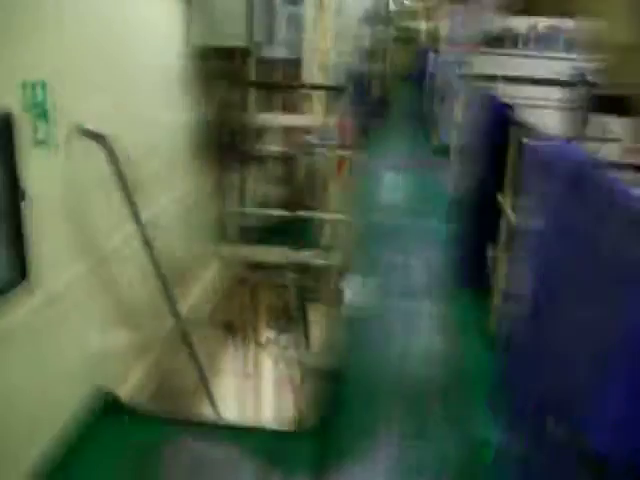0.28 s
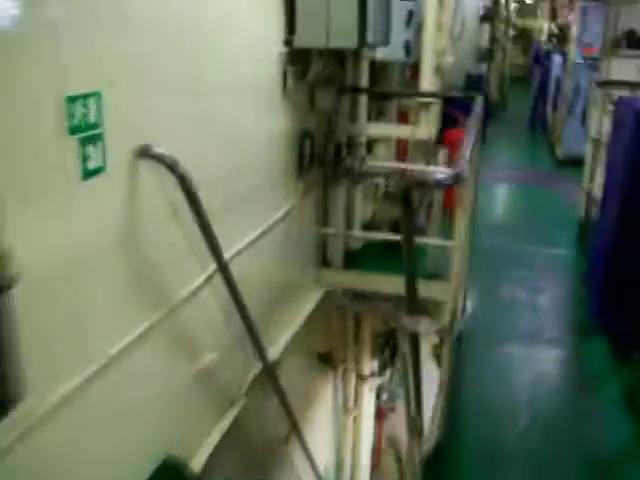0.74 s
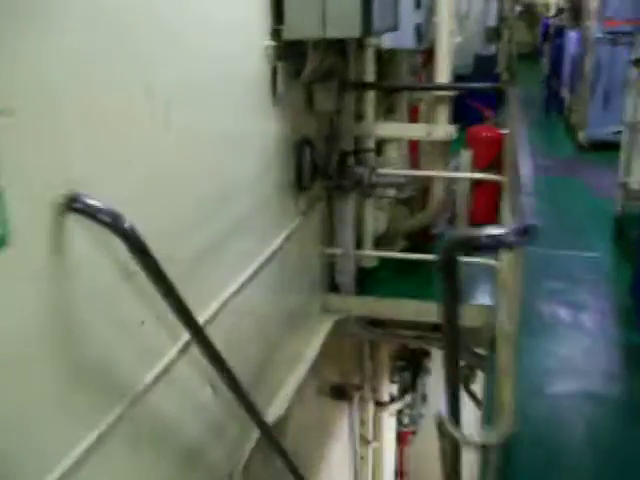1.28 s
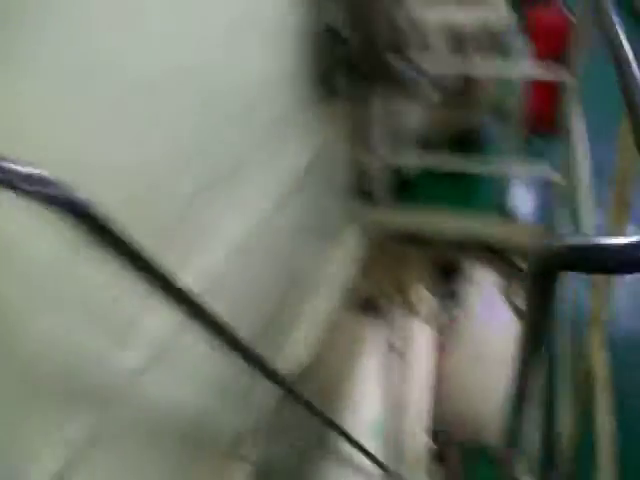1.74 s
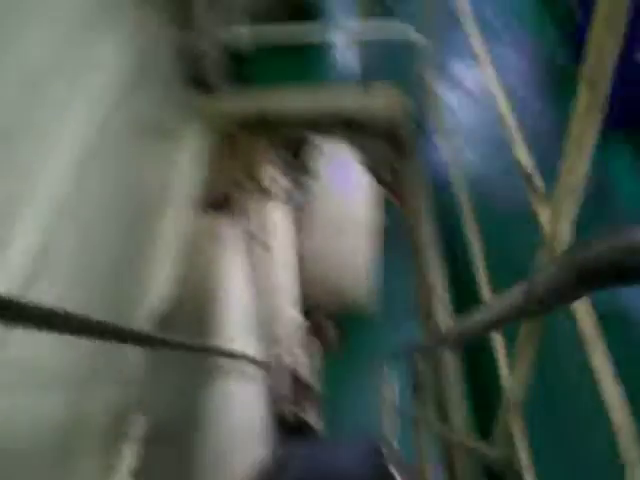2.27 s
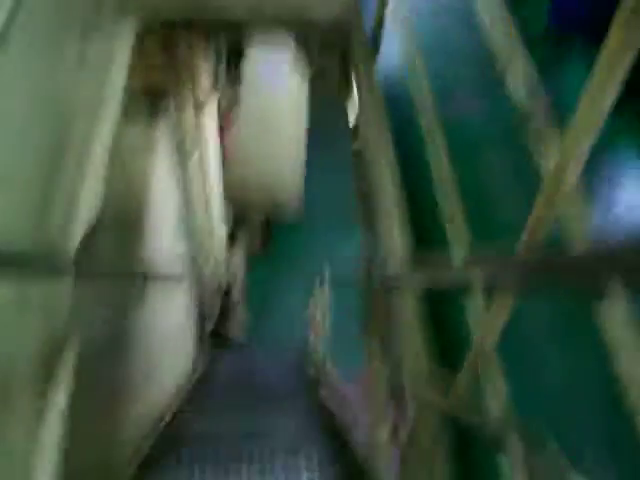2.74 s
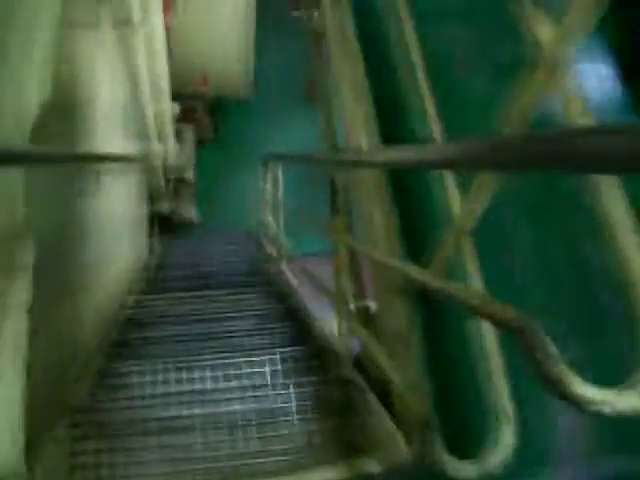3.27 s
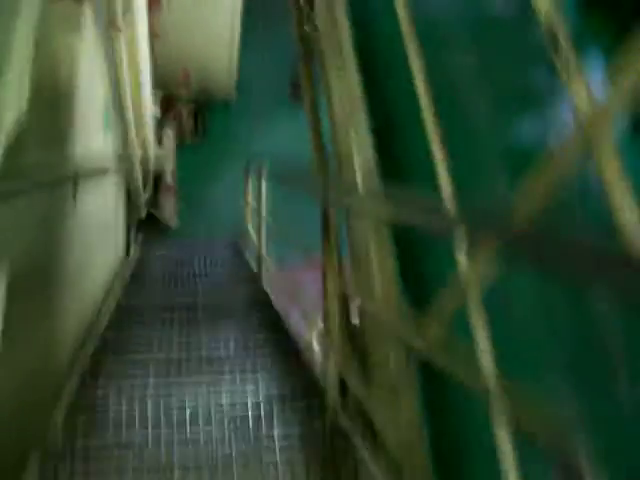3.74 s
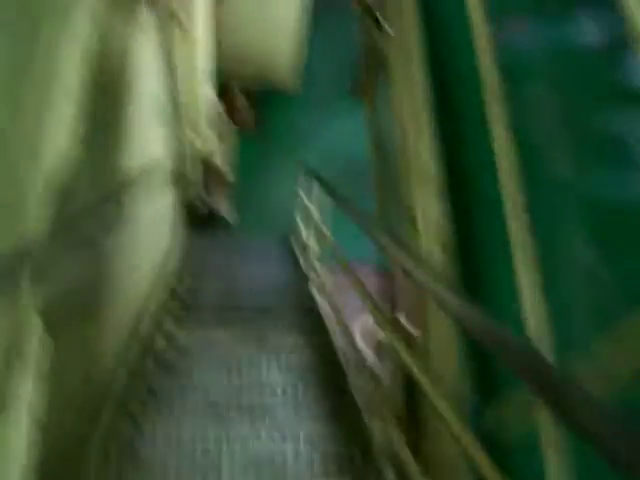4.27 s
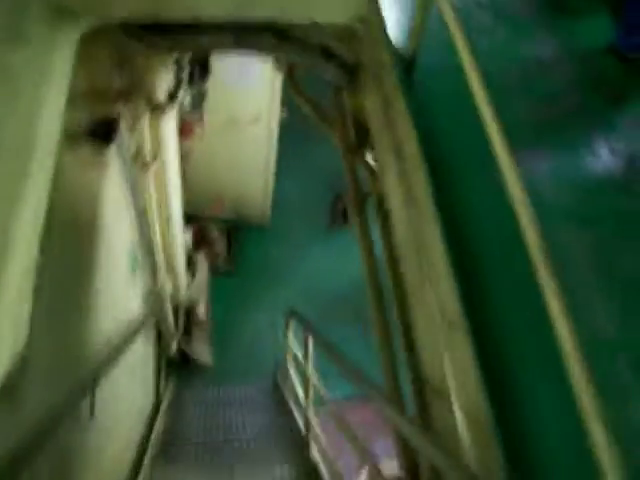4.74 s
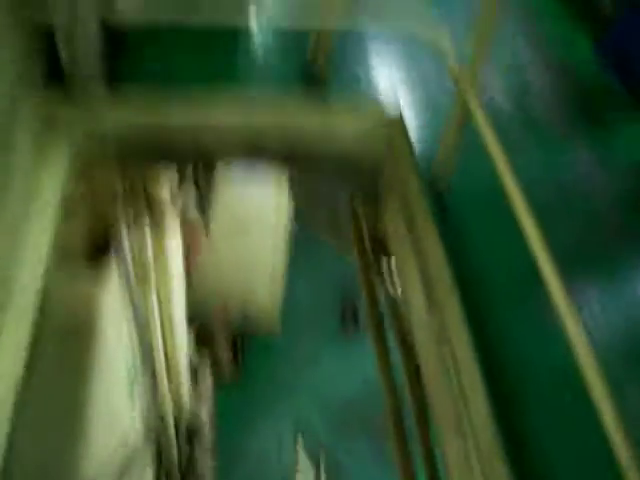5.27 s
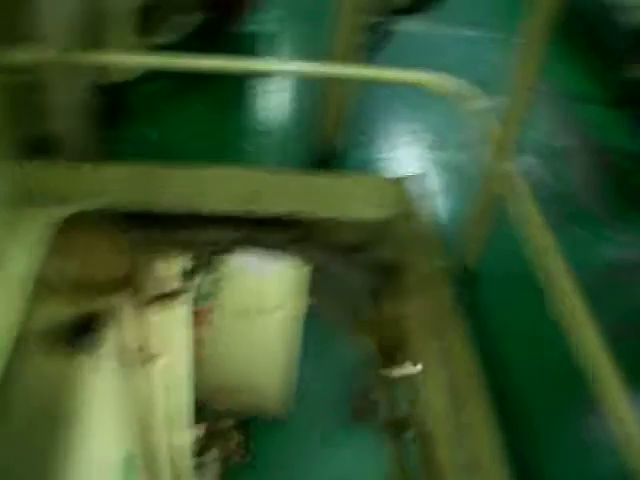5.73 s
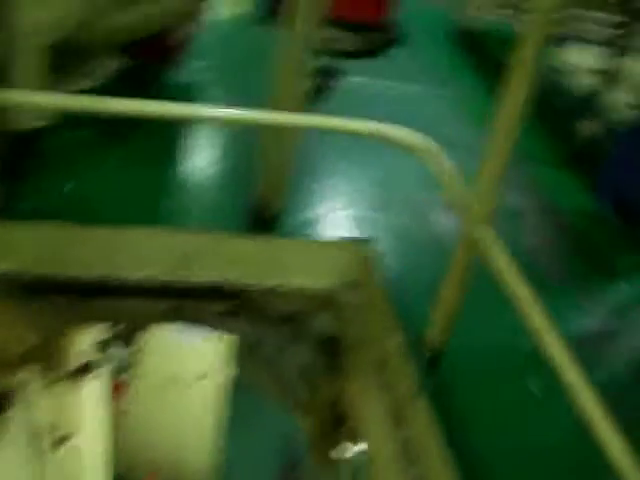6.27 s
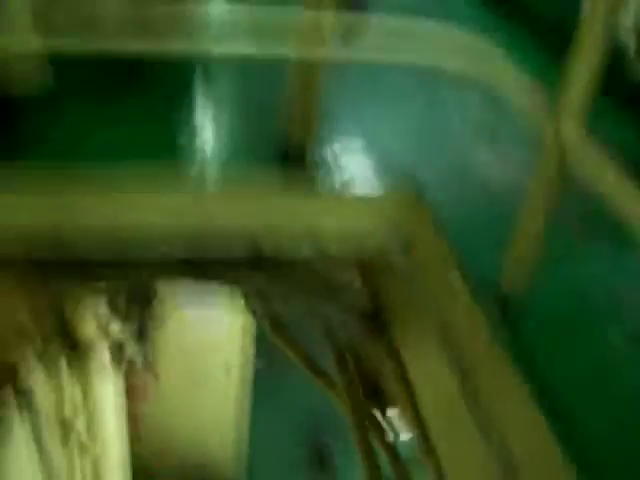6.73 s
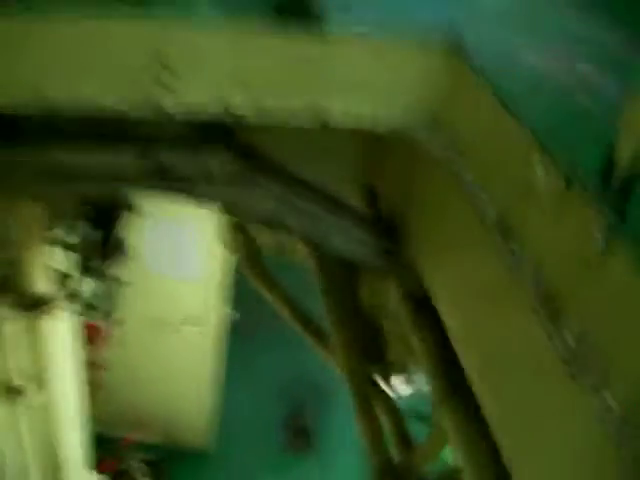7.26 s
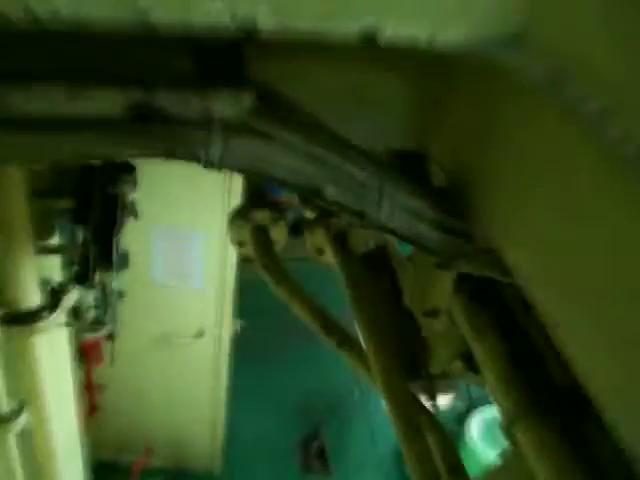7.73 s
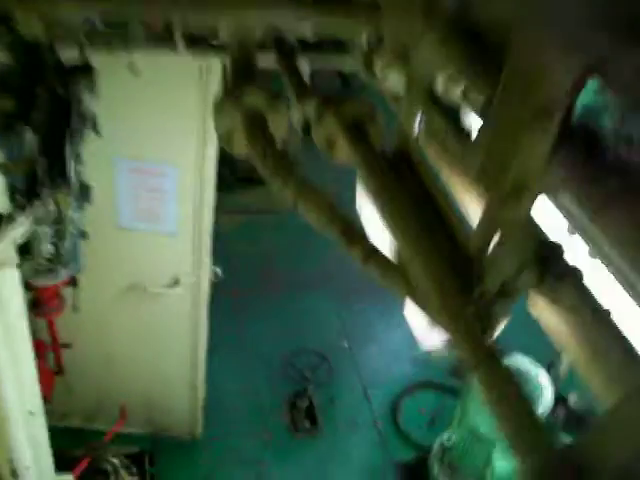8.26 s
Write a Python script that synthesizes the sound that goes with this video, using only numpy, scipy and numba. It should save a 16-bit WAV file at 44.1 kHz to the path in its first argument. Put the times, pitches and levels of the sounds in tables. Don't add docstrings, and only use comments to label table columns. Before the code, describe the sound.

Continuous, very loud machinery noise on a ship, heard from a handheld camera moving from an open hall towards a stairwell. Low engine pulses beat against each other over hull rumble, rough combustion roar and metallic clatter. A high, piercing whine fades in and out as the camera turns; a mid-pitched hum swells. Sharp knocks come around two seconds and near five, all compressed and slightly distorted.

```python
import sys
import numpy as np
from scipy import signal
from scipy.fft import rfft, irfft, next_fast_len
from scipy.io import wavfile
from scipy.ndimage import uniform_filter1d, map_coordinates
from numba import njit

SR = 44100
rng = np.random.default_rng(int(sys.argv[2]) if len(sys.argv) > 2 else 0)


def nominal_scale(level):
    x = np.asarray(level, float) / 20
    return 10 ** x


def transcribe(u):
    v = np.clip(np.atleast_2d(u).T, -1, 1)
    q = np.round(v * 32767).astype(np.int16)
    wavfile.write(sys.argv[1], SR, q)


N = 374850
TIME = np.arange(N) / SR
FULL_SCALE = 0.7

# (cycle rate [Hz], moment of one firing [s])
TWINS = [
    (4.0460, 4.4771),
    (3.9853, 4.4768),
]


def unit(x):
    return x / np.sqrt(np.mean(x ** 2) + 1e-20)


def curves(rows):
    s, *columns = np.transpose(rows)
    return [np.interp(TIME, s, column) for column in columns]


def wobble(rate):
    points = rng.standard_normal(int(N * rate / SR) + 4)
    return map_coordinates(points, [TIME * rate])


def coloured(x, spectrum):
    size = next_fast_len(N + 8192)
    hz, db = np.transpose(spectrum)
    bins = np.fft.rfftfreq(size, 1 / SR)
    gain = nominal_scale(np.interp(np.log(bins + 1), np.log(hz + 1), db))
    return irfft(rfft(x, size) * gain, size)[:N]


def rush(spectrum, patchy_db):
    z = signal.stft(rng.standard_normal(N + 512), nperseg=512)[2]
    patches = uniform_filter1d(rng.standard_normal(z.shape), size=5, axis=0)
    patches = uniform_filter1d(patches, size=12, axis=1)
    noise = signal.istft(z * nominal_scale(patchy_db * unit(patches)), nperseg=512)[1][:N]
    return unit(coloured(noise, spectrum))


def narrow(hz, width):
    turn = 2 * np.pi * hz * TIME
    return unit(wobble(width) * np.cos(turn) + wobble(width) * np.sin(turn))


def in_step():
    (near_hz, near_fired), (far_hz, _) = TWINS
    half_beat = 6 * np.pi * (near_hz - far_hz)
    return np.abs(np.cos(half_beat * (TIME - near_fired)))


def pushed(mean_db, swing_db):
    return mean_db + swing_db * in_step()


def firings(decay_s, scatter_db):
    blows = np.zeros(N)
    for cycle_hz, fired in TWINS:
        at = np.flatnonzero(np.diff(np.floor(6 * cycle_hz * (TIME - fired))))
        blows[at] += nominal_scale(scatter_db * rng.standard_normal(len(at)))
    t = TIME[:SR // 10]
    return unit(signal.fftconvolve(blows, t * np.exp(-t / decay_s))[:N])


def pump():
    # (time [s], length [s], level [dB])
    swells = [
        (0.503, .45, -34.5),
        (2.902, 1.0, -30),
        (4.19, .4, -36),
        (6.002, .6, -23.5),
        (7.1, .4, -40),
        (8.5, .5, -33),
    ]
    level = sum(nominal_scale(db) * np.exp(-((TIME - s) / length) ** 2) for s, length, db in swells)
    return level * np.sin(2 * np.pi * 546.4 * TIME + 0.6 * wobble(2.5))


def hull_rumble(deck_db):
    # (frequency [Hz], level [dB per Hz])
    spectrum = [(5, -28.5), (12, -6), (38, -0.5), (60, -2), (100, -2.5), (150, -3.5), (200, -12),
                (330, -46), (600, -120)]
    return nominal_scale(pushed(-31, 8) + 0.4 * deck_db + 3.0) * rush(spectrum, patchy_db=0.0)


def whistles():
    # (frequency [Hz], width [Hz], level [dB])
    lines = [(3181, 14, -41), (4860, 38, -55), (2560, 120, -47), (3088, 45, -41.5), (390, 5, -36.5),
             (790, 12, -46), (99, 1, -36)]
    return sum(nominal_scale(db + wobble(1.2)) * narrow(hz, width) for hz, width, db in lines)


def turbocharger():
    # (time [s], frequency [Hz])
    blade_tone = [(0, 3083), (1.3, 3083), (2.4, 3089), (4.2, 3089), (4.9, 3086), (5.6, 3089), (8.5, 3086)]
    # (time [s], level [dB])
    shading = [(0, -28), (.54, -27), (.77, -27), (1.28, -29), (1.58, -21), (2.06, -35.5), (2.45, -24),
               (2.95, -34.5), (3.65, -37.5), (4.1, -29), (4.85, -36.5), (5.39, -26.5), (5.78, -38),
               (6.05, -29.5), (7.04, -35.5), (7.65, -35), (8.07, -28.5), (8.5, -30.5)]
    # (time [s], width [s], depth [dB])
    quiet_spots = [(.075, 0.026, -12.5), (0.169, 0.065, -9), (.335, .04, -8.5), (.499, 0.033, -11),
                   (.64, 0.026, -7), (1.168, 0.055, -10.5), (1.393, 0.077, -12.5), (1.514, 0.11, -13),
                   (1.605, 0.09, -17), (2.309, 0.1, -10.5), (2.59, 0.079, -4), (3.056, .121, -10),
                   (3.994, 0.2, -11.7), (4.174, 0.07, -9), (4.276, 0.03, -14.5), (4.343, 0.059, -11.8),
                   (4.72, .14, -8.5), (5.107, .049, -9.5), (5.312, 0.16, -14.5), (6.15, 0.054, -12),
                   (6.58, .162, -8), (6.798, .047, -10), (6.943, .036, -11.5), (7.304, .05, -10.5),
                   (7.39, .04, -9.5), (7.494, .033, -11.5), (7.65, .039, -7.5), (8.129, 0.064, -16),
                   (8.27, 0.13, -14.5), (8.46, 0.062, -16)]
    hz = curves(blade_tone)[0] + 2.6 * wobble(5) + 3 * wobble(25)
    paths = 1 + 0.3 * (wobble(30) + 1j * wobble(30))
    tone = np.sqrt(2) * np.real(paths * np.exp(2j * np.pi * np.cumsum(hz) / SR))
    level_db = curves(shading)[0] + pushed(1, 6.5) + 1.1 * wobble(40)
    for s, width, depth_db in quiet_spots:
        level_db = level_db + depth_db * np.exp(-(2.6 * (TIME - s) / width) ** 2)
    return nominal_scale(level_db) * tone


def casing_clatter(hall_db, shared):
    # (frequency [Hz], level [dB per Hz])
    spectrum = [(530, -34), (900, 0), (1040, -5.5), (1890, -14.5), (2900, -9.5), (2990, -8.5), (3160, -10),
                (3350, -11), (4990, -21), (5600, -23), (7280, -51), (12300, -120)]
    level_db = pushed(-35, 6.5) + 1.3 * hall_db + 3.0 + 0.5 * shared
    pulses = 1 + 0.11 * firings(0.0031, 3.9)
    return nominal_scale(level_db) * unit(pulses * rush(spectrum, patchy_db=0.4))


def sharp_peaks():
    # (time [s], peak level [dB])
    sudden_peaks = [
        (2.150, -0.5),
        (2.313, -7.5),
        (4.825, -12.5),
        (5.073, -11.5),
        (5.681, -6.5),
    ]
    out, t = np.zeros(N + SR), TIME[:SR // 50]
    for s, db in sudden_peaks:
        hiss = 0.15 * rng.standard_normal(len(t)) * nominal_scale(-60 * t / 0.008)
        ring = np.sin(2 * np.pi * 650 * t) + hiss
        out[round(s * SR):][:len(t)] -= nominal_scale(db + 0.5 - 60 * t / 0.012) * ring
    return out[:N]


def cycle_roar():
    # (frequency [Hz], level [dB per Hz])
    spectrum = [(100, -39.5), (150, -6.5), (250, 0), (400, 0.5), (600, -10), (1000, -47), (2000, -120)]
    out = np.zeros(N)
    for cycle_hz, fired in TWINS:
        size = round(SR / cycle_hz)
        one_cycle = rng.standard_normal(size)
        wandering = TIME + 0.0006 * wobble(0.8)
        out += np.interp(wandering * cycle_hz % 1, np.arange(size) / size, one_cycle)
    return unit(coloured(out, spectrum))


def combustion_roar(hall_db, shared):
    # (frequency [Hz], level [dB per Hz])
    spectrum = [(90, -45), (150, -13.5), (190, -11), (260, -9.5), (398, -7.5), (535, -8), (673, -13),
                (792, -12.5), (1030, -31), (1230, -21.5), (1500, -31), (1950, -62), (3300, -120)]
    level_db = pushed(-23, 6.5) + hall_db + 0.7 + 0.25 * shared
    pulses = 1 + 0.13 * firings(0.0027, 2.4)
    noise = rush(spectrum, patchy_db=-0.06) + nominal_scale(-8) * cycle_roar()
    return nominal_scale(level_db) * unit(pulses * noise)


def engine(cycle_hz, fired, orders, rest_db, boom_db):
    crank = 2 * np.pi * cycle_hz * (TIME - fired)
    sound = nominal_scale(-16.8 + 0.3 * wobble(0.7)) * np.cos(6 * crank)
    for k, db in orders:
        if k == 6:
            continue
        drift = rng.uniform(0, 2 * np.pi) + 0.0071 * k * wobble(0.8)
        deck = boom_db if k == 18 else 0
        sound += nominal_scale(db + rest_db + deck + 1.5 * wobble(0.44)) * np.cos(k * crank + drift)
    return np.sqrt(2) * sound


def twin_diesels(deck_db):
    # (multiple of the cycle rate [1], rms level [dB])
    near_tones = [(5, -34.2), (6, -20.6), (7, -34.8), (8, -36.0), (11, -38.2), (12, -38.8), (13, -37.2),
                  (17, -37.9), (18, -35.9), (19, -36.8), (21, -46.3), (22, -45.1), (23, -42.5), (24, -37.5),
                  (25, -36.1), (26, -36.9), (28, -45.8), (29, -41.0), (30, -44.3), (35, -39.6), (36, -44.3),
                  (37, -44.9), (45, -44.6), (46, -42.4), (48, -46.1), (49, -43.8), (50, -44.0), (53, -43.3),
                  (54, -41.2), (57, -46.5)]
    far_tones = [(5, -39.1), (6, -21.5), (7, -40.0), (8, -44.7), (10, -45.2), (11, -38.8), (12, -41.5),
                 (13, -38.3), (16, -46.4), (17, -40.0), (18, -30.5), (19, -42.2), (20, -43.2), (23, -41.9),
                 (28, -42.3), (46, -39.4), (49, -45.6), (50, -44.2), (54, -47.5), (55, -41.8)]
    shake_db = pushed(-2.9, 6.6)
    near = engine(*TWINS[0], near_tones, shake_db, -6.0)
    far = engine(*TWINS[1], far_tones, shake_db, deck_db + 1.2)
    return near + far


def scene():
    # (time [s], open hall level [dB], lower deck level [dB])
    view = [(0, 1, -4), (.6, 0, -0.5), (1.3, 1, -8), (2, 0, -3), (2.6, 0, -2.5), (3.3, 1, 2.5), (4, -.5, 1),
            (4.9, -.5, -3.5), (5.6, 0.5, 4.5), (6.3, 0, 1.5), (7.1, 0, 1.5), (7.8, 0.5, 8.5), (8.5, 0, 2)]
    hall_db, deck_db = curves(view)
    shared = wobble(16)
    background = pump() + hull_rumble(deck_db) + whistles() + turbocharger()
    noise = casing_clatter(hall_db, shared) + sharp_peaks() + combustion_roar(hall_db, shared)
    return (background + noise + twin_diesels(deck_db))[None]


@njit
def follow(x, rise, fall):
    out, level = np.empty_like(x), np.mean(x)
    for i in range(len(x)):
        level += (rise if x[i] > level else fall) * (x[i] - level)
        out[i] = level
    return out


def gain_control(x):
    # (frequency [Hz], level [dB])
    sensed_bass = [(10, 6), (40, 6), (150, 0), (6000, 0)]
    # (frequency [Hz], level [dB])
    deep_band = [(5, 0), (30, 0), (40, -20), (60, -120)]
    sensed = np.abs(coloured(x, sensed_bass))
    slow = follow(sensed, 1 / (0.0036 * SR), 1 / (0.25 * SR))
    fast = follow(sensed, 1 / (0.003 * SR), 1 / (0.007 * SR))
    gain = nominal_scale(-1.5) * (slow / 0.47) ** -0.2 * np.maximum(fast / 0.35, 0.55) ** -0.6
    deep = coloured(x, deep_band)
    return (x - deep) * gain + deep * nominal_scale(-2.5) * gain ** 0.53


def capsule(x):
    x = x - 0.15 * (x ** 2 - np.mean(x ** 2))
    return x / (1 + np.abs(x / (0.96 * FULL_SCALE)) ** 9) ** (1 / 9) - 0.0012


def converter(x):
    # (time [s], surge length [ms], flipped length [ms])
    overflows = [
        (.51545, .3, .08),
        (3.93312, .6, .11),
    ]
    for s, surge_ms, flip_ms in overflows:
        ms = np.abs(TIME - s) * 1000
        x = x + (1.02 * FULL_SCALE - x) * np.exp(-(ms / surge_ms) ** 1.5)
        x = x - 2.2 * FULL_SCALE * np.clip((flip_ms / 2 - ms) * SR / 1000 + 0.5, 0, 1)
    return x


def band_edge(x):
    # (frequency [Hz], level [dB])
    treble_edge = [(5300, 1), (5700, -6.5), (5950, -9), (6300, -67.5), (6500, -120)]
    return np.clip(coloured(x, treble_edge), -FULL_SCALE, 0.72)


def low_pass(x):
    return signal.sosfilt(signal.butter(12, 15800, fs=SR, output="sos"), x)


def record(dry):
    x = gain_control(dry[0])
    x = converter(capsule(x))
    return low_pass(band_edge(x)[None])


dry = scene()
out = record(dry)
transcribe(out)
```